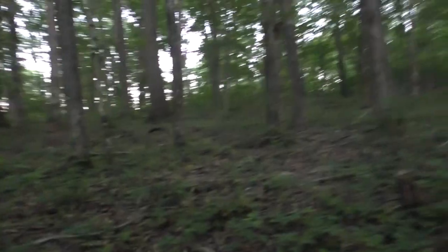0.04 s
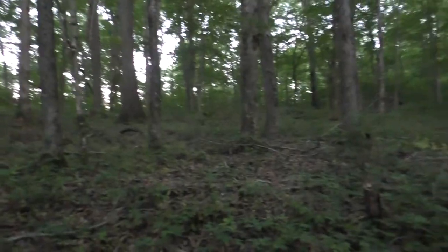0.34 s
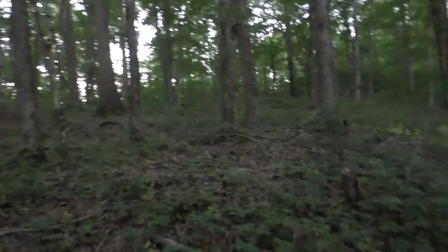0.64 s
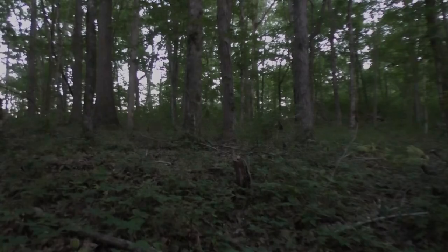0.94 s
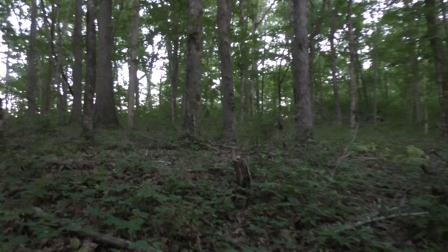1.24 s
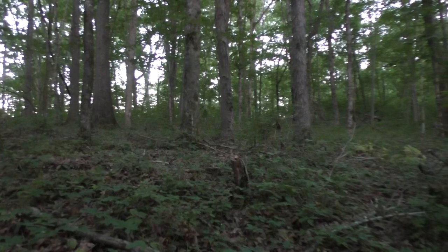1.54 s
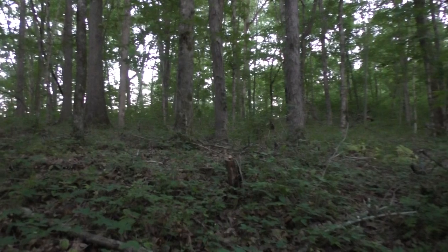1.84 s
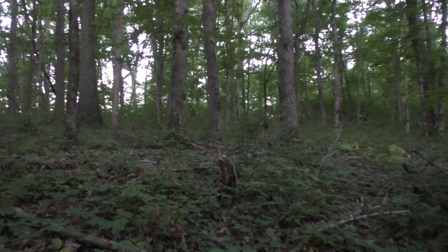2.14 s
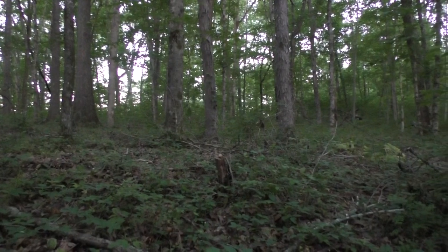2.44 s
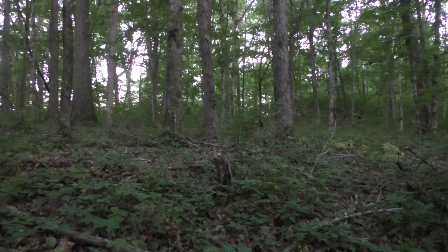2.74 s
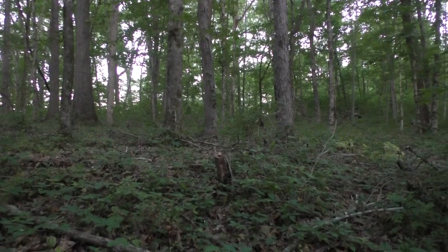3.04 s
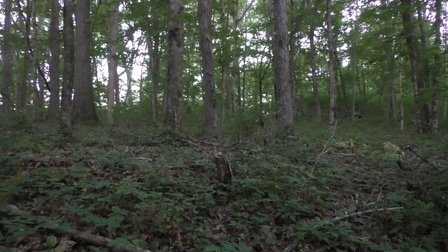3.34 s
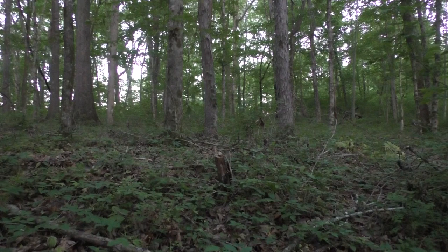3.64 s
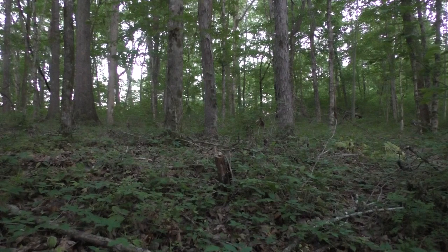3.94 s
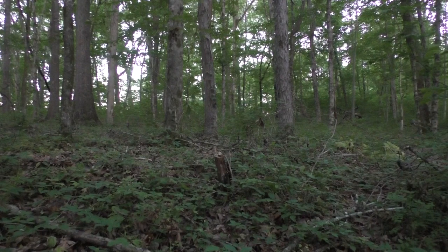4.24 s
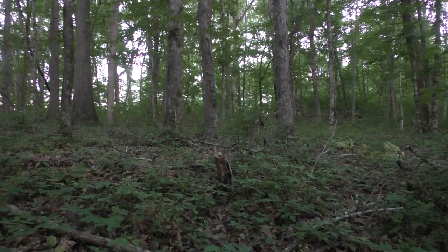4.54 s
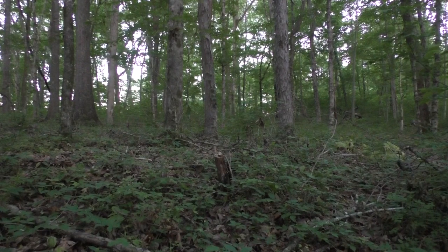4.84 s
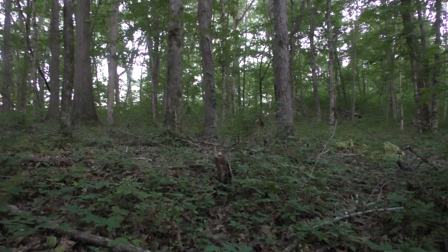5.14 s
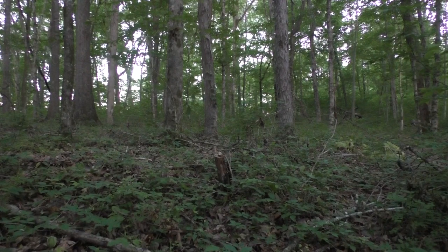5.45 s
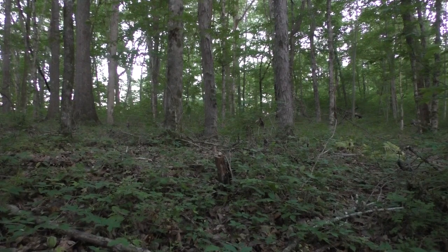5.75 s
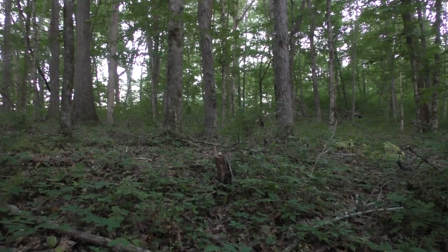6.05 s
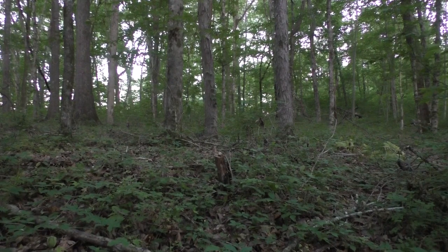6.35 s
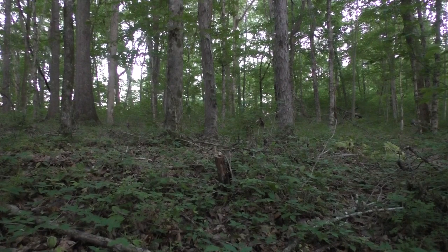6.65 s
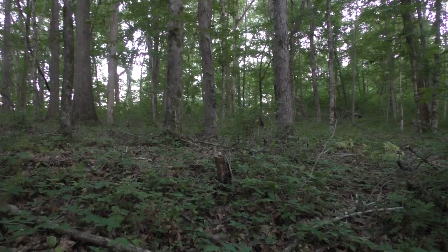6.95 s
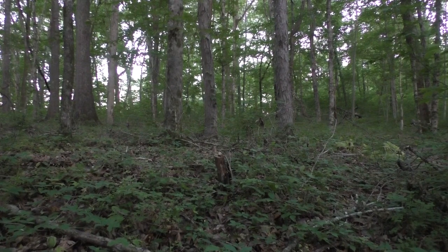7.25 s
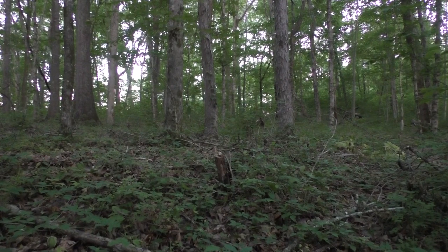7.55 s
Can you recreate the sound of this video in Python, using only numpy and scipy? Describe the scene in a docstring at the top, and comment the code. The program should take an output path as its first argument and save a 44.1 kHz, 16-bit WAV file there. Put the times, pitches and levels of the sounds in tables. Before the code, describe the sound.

Small birds whistle far off in a wood; after brief handling noise, eight loud, raspy turkey-like yelps sound close on the left.

```python
"""A rustle and a bump: a camera is set down in a wood, brushed by cloth and leaves, its mount clicking.
Small birds whistle far off, scattered by the trees, over a low drone and soft air.
Eight turkey-like yelps follow very close on the left, probably from a hunter's friction call: each
scrapes, holds a high note and breaks to a low one, an unsteady vibration ringing the call's resonances.
The camera's gain control ducks the wood after the yelps."""
import sys
import numpy as np
from scipy import signal
from scipy.fft import rfft, irfft, next_fast_len
from scipy.io import wavfile
from scipy.ndimage import uniform_filter1d, minimum_filter1d, map_coordinates

SR = 44100
rng = np.random.default_rng(int(sys.argv[2]) if len(sys.argv) > 2 else 0)


def bounce(signal):
    """Save signal as a 16-bit WAV file at the path given by the first command-line argument."""
    frames = np.transpose(np.atleast_2d(signal))
    limited = np.clip(frames, -1, 1)
    pcm = np.round(limited * 32767).astype(np.int16)
    wavfile.write(sys.argv[1], SR, pcm)


N = 339570


def amp(db):
    """Decibels to gain."""
    return 10 ** (np.asarray(db) / 20)


def pan(db):
    """Stereo gains: right up by db, left down by db."""
    return amp([[-db], [db]])


def unit(x):
    """Scale to rms 1."""
    return x / np.sqrt(np.mean(x ** 2) + 1e-20)


def along(points, hz):
    """Interpolate (f/Hz, value) points on a log axis."""
    f, v = np.transpose(points)
    return np.interp(np.log(hz + 1), np.log(f + 1), v)


def clock(length_s):
    """Sample times of a short sound."""
    return np.arange(int(length_s * SR)) / SR


def add(track, start_s, x):
    """Mix x into the track."""
    part = track[..., max(round(start_s * SR), 0):][..., :x.shape[-1]]
    part += x[..., :part.shape[-1]]


def wobble(rate_hz, size):
    """Smooth random curve, rate_hz knots a second."""
    at = np.arange(size) * rate_hz / SR
    return map_coordinates(rng.standard_normal(4096)[:int(at[-1]) + 4], [at])


def filtered(x, response):
    """Apply a frequency response."""
    m = next_fast_len(x.shape[-1] + SR // 10)
    return irfft(rfft(x, m) * response(np.fft.rfftfreq(m, 1 / SR)), m)[..., :x.shape[-1]]


def equalize(x, points):
    """Zero-phase filter through (f/Hz, gain/dB) points."""
    return filtered(x, lambda hz: amp(along(points, hz)))


def resonate(x, points, size=4096):
    """Minimum-phase filter through (f/Hz, gain/dB) points: the peaks ring on."""
    cepstrum = irfft(np.log(amp(along(points, np.fft.rfftfreq(size, 1 / SR)))))
    cepstrum[1:size // 2] *= 2
    cepstrum[size // 2:] = 0
    impulse = irfft(np.exp(rfft(cepstrum)))
    return signal.fftconvolve(x, impulse)[:len(x)]


# Left-right likeness of the noise: f/Hz, correlation
COHERENCE = [(30, 0.11), (60, 0.87), (290, 0.14), (1200, 0.78), (6800, 0.063)]


def stereo_noise(spectrum):
    """Shaped noise of rms 1, partly alike in the two channels."""
    def mid_side(hz):
        angle = np.arccos(np.clip(along(COHERENCE, hz), -1, 1)) / 2
        return amp(along(spectrum, hz)) * [np.cos(angle), np.sin(angle)]

    mid, side = filtered(rng.standard_normal((2, N)), mid_side)
    return unit(np.array([mid + side, mid - side]))


# Spectra of the drone and the air: f/Hz, level/dB
DRONE_SPECTRUM = [(30, -20), (64, 1.5), (82, -10), (101, -2.5), (130, -16.5), (400, -35), (1000, -92)]
AIR_SPECTRUM = [(250, -5.5), (850, -9.5), (1300, -11), (2000, -14.5), (3300, -10), (4800, -27.5),
                (7500, -22), (10800, -32.5), (13000, -26.5)]


def background():
    """A far low drone under soft air and hiss, both wavering slightly."""
    drone = amp(-38.5 + 0.91 * wobble(4.276, N)) * stereo_noise(DRONE_SPECTRUM)
    air = amp(-45.5 + 0.99 * wobble(0.46, N)) * stereo_noise(AIR_SPECTRUM)
    return drone * pan(1.5) + air * pan(1.1)


# Reverberation of the wood: f/Hz, t60/s
WOOD_DECAY = [(1200, 1.35), (3000, 1.88), (8000, 1.15)]


def trees(x, early_db, early_t60_s):
    """Stereo echo: dense scatter from near trunks, then the long tail of the wood."""
    hz, t, noise = signal.stft(rng.standard_normal((2, SR)), SR, nperseg=256)
    tail = amp(-60 * t / along(WOOD_DECAY, hz)[:, None])
    early = amp(early_db - 60 * t / early_t60_s)
    impulse = signal.istft(noise * (tail + early), SR, nperseg=256)[1]
    return signal.fftconvolve(x[None], impulse / np.linalg.norm(impulse[0]), axes=1)[:, :N]


def distant(song, direct_db, early_db):
    """A far bird: weak direct path, much scatter from the trees."""
    return amp(direct_db) * song + trees(song, early_db, early_t60_s=0.13)


def note(length_s, start_hz, middle_hz, end_hz, db, flutter):
    """A whistle bending through three pitches, widened by a fast flutter."""
    progress = clock(length_s) / length_s
    contour = np.polyfit([0, 0.5, 1], [start_hz, middle_hz, end_hz], 2)
    pitch_hz = np.polyval(contour, progress) * (1 + flutter * wobble(261.2, len(progress)))
    tone = np.sin(2 * np.pi * np.cumsum(pitch_hz) / SR)
    return amp(db) * unit(signal.windows.tukey(len(tone), 0.4) * tone)


# Birds too far off for single notes to stand out: start/s, stop/s, centre f/Hz, level/dB
CHORUS_SPANS = [(0.304, 0.696, 2980, -49.5), (1.498, 3.397, 4570, -62), (1.901, 4.103, 2788, -48.5),
                (4.62, 5.3, 3040, -40), (6.148, 7.7, 3454, -55), (6.15, 7.694, 5400, -54),
                (6.185, 7.7, 1349, -50.5)]


def chorus(count=20, pitch_spread=0.16):
    """Random far chirps that swell in, blurred by the trees."""
    chirps = np.zeros(N)
    for start_s, stop_s, centre_hz, db in CHORUS_SPANS:
        gap_s = (stop_s - start_s) / count
        for s in start_s + gap_s * (np.arange(count) + rng.random(count)):
            pitches_hz = centre_hz * (1 + pitch_spread * rng.uniform(-1.2, 1, 3))
            swell = min(0.49 + 3 * (s - start_s) / (stop_s - start_s), 1)
            chirp = note(0.07, *pitches_hz, db + 2 * rng.standard_normal(), flutter=0.0364)
            add(chirps, s, swell * np.sqrt(gap_s / 0.041) * chirp)
    return distant(chirps, direct_db=-15, early_db=-9) * pan(1)


# Notes that arch, slide down or flick up: t/s, length/s, top f/Hz, level/dB
ARCHED_NOTES = [(0.989, 0.099, 4570, -70), (1.168, .1, 3370, -51), (1.265, .1, 3920, -44),
                (2.027, 0.24, 3467, -40.5), (2.892, .11, 2380, -38), (3.167, 0.13, 2947, -33.5),
                (3.268, 0.09, 2430, -34), (3.815, 0.11, 3640, -36), (6.01, 0.24, 3383, -34.5)]
FALLING_NOTES = [(0.281, .15, 3058, -32), (2.548, 0.22, 3370, -35.5), (3.034, 0.05, 6600, -48),
                 (3.298, .11, 3254, -35.5), (3.395, .04, 6720, -48), (3.998, 0.088, 2513, -34),
                 (4.368, 0.075, 3147, -30.5), (5.431, 0.15, 3186, -35)]
RISING_NOTES = [(0.801, 0.052, 3380, -62), (.9, 0.044, 3920, -61), (1.856, 0.052, 4380, -53.5),
                (2.422, 0.046, 4030, -42.5), (3.637, 0.14, 2818, -34), (4.313, 0.079, 3250, -36.5),
                (6.416, 0.062, 4510, -42)]
# Buzzy song that climbs and swells: t/s, f/Hz, level/dB
BUZZY_NOTES = [(7.22, 5150, -55), (7.279, 4430, -49), (7.329, 6180, -49), (7.56, 6320, -46)]


def phrases(flutter_per_hz=1.1e-5):
    """Slurred bird notes, the higher ones fluttering more, and a buzzy song."""
    arch, fall, rise = (0.78, 0.96, 0.82), (0.98, 0.89, 0.77), (0.76, 0.9, 1)  # pitch / top pitch
    out = np.zeros(N)
    for contour, notes in (arch, ARCHED_NOTES), (fall, FALLING_NOTES), (rise, RISING_NOTES):
        for s, length_s, top_hz, db in notes:
            pitches_hz = top_hz * np.array(contour)
            add(out, s, note(length_s, *pitches_hz, db, flutter=flutter_per_hz * top_hz))
    for s, hz, db in BUZZY_NOTES:
        add(out, s, note(0.1, hz, hz, hz, db, flutter=0.0463))
    return out


# Rolling songs: t/s, level/dB
ROLLING_SONGS = [(1.379, -35.5), (5.499, -36.5)]


def rolling_songs(count=7, period_s=0.165, second_note_s=0.072):
    """A repeated pair of notes: one falls, the next is louder and trails a faint buzz."""
    out = np.zeros(N)
    for start_s, db in ROLLING_SONGS:
        for s in start_s + period_s * np.arange(count):
            add(out, s, note(0.0493, 2726, 2420, 2287, db - 1, flutter=0.02))
            add(out, s + second_note_s, note(0.0265, 2550, 2674, 2540, db + 4.5, flutter=0.023))
            add(out, s + second_note_s, note(period_s, 2550, 2550, 2550, db - 9, flutter=0.05))
    return out


# Thin whistles: t/s
THIN_WHISTLE_TIMES = [0.7, 1.24, 2.08, 2.781, 3.409, 4.04, 5.532, 7.28]


def thin_whistles():
    """Two high falling tones that start together."""
    out = np.zeros(N)
    for s in THIN_WHISTLE_TIMES:
        add(out, s, note(0.14, 8050, 7500, 7350, db=-54, flutter=0.0123))
        add(out, s, note(0.056, 6750, 6650, 6580, db=-56, flutter=0.0098))
    return out


# Low whistles: t/s, length/s, start f/Hz, end f/Hz, level/dB
LOW_NOTES = [(6.859, 0.22, 1634, 1635, -43), (7.178, 0.0644, 1687, 1425, -39),
             (7.384, .035, 1465, 2070, -40.5), (7.412, .03, 2004, 1700, -43),
             (7.441, 0.052, 1690, 1694, -35), (7.643, .055, 1540, 2750, -43)]


def low_whistler():
    """A bird wavering through low, straight glides."""
    out = np.zeros(N)
    for s, length_s, start_hz, end_hz, db in LOW_NOTES:
        add(out, s, note(length_s, start_hz, (start_hz + end_hz) / 2, end_hz, db, flutter=0.02))
    return out


def birds():
    """The small birds heard through the trees, mostly to the right."""
    slurs, rolls, thin, low = phrases(), rolling_songs(), thin_whistles(), low_whistler()
    out = distant(slurs, direct_db=-4, early_db=-4)
    out += distant(rolls, direct_db=-6, early_db=-1)
    out += amp(-4) * low + amp(-5) * trees(low, early_db=0, early_t60_s=0.1)
    out += distant(thin, direct_db=-21, early_db=-15)
    return out * pan(1.5)


# Handling envelope: t/s, rumble level/dB, rustle level/dB
HANDLING_LEVELS = [(0.0, -28.5, -37.5), (0.3, -16.5, -28), (0.495, -46, -24.5), (0.79, -39, -39.5)]
# Spectra of the handling noises: f/Hz, level/dB
RUSTLE_SPECTRUM = [(59, -45), (100, 1.5), (1100, -6.5), (2630, -11.5), (15500, -27.5)]
SWISH_SPECTRUM = [(400, -19), (1100, 4.5), (5000, -7), (9000, -6), (11000, -18), (15500, -12)]
RUMBLE_SPECTRUM = [(12, -38), (20, 8), (43, -11.5), (350, -29), (660, -120)]


def handling(swish_s=0.487, swish_width_s=0.073, swish_db=-23.5):
    """Cloth and leaves brush the swaying camera, with one bright swish on the right."""
    t = np.arange(N) / SR
    times_s, rumble_db, rustle_db = np.transpose(HANDLING_LEVELS)
    grain = unit(amp(1.24 * wobble(400, N)))
    rustle = amp(np.interp(t, times_s, rustle_db, right=-120)) * stereo_noise(RUSTLE_SPECTRUM)
    swish = amp(swish_db) * np.exp(-((t - swish_s) / swish_width_s) ** 2) * stereo_noise(SWISH_SPECTRUM)
    rumble = amp(np.interp(t, times_s, rumble_db, right=-120)) * stereo_noise(RUMBLE_SPECTRUM)
    return grain * (rustle * pan(2) + swish * pan(3)) + rumble * pan(-2)


# Clicks of the camera's mount: t/s, tick level/dB, knock level/dB
MOUNT_CLICKS = [(.16, -47, -19.5), (0.559, -34, -23), (0.731, -22, -23.5), (.749, -26, -19),
                (0.758, -39, -21), (.77, -33, -30)]


def mount_clicks(tick_t60_s=0.017, knock_t60_s=0.048):
    """Each click is two noise bursts: a bright tick and a duller knock."""
    out, t = np.zeros((2, N)), clock(0.3)
    for s, tick_db, knock_db in MOUNT_CLICKS:
        tick, knock = rng.standard_normal((2, 2, len(t)))
        knock = unit(equalize(knock, [(200, -7.5), (700, 7.5), (5000, -20)]))
        add(out, s, amp(tick_db - 60 * t / tick_t60_s) * tick)
        add(out, s, amp(knock_db - 60 * t / knock_t60_s) * knock)
    return out


# Tones of the bump: t/s, f/Hz, level/dB, t60/s
BUMP_MODES = [(0.255, 375, -5.5, 0.1), (0.264, 40.8, -4.5, 0.28)]


def bump(attack_s=0.0037, lead_rad=0.41):
    """The camera bumps down: damped tones that lead at the left port and lag at the right."""
    out, t = np.zeros((2, N)), clock(0.3)
    for s, hz, db, t60_s in BUMP_MODES:
        envelope = amp(db - 60 * t / t60_s) * (1 - np.exp(-t / attack_s))
        add(out, s, envelope * np.sin(2 * np.pi * hz * t + [[lead_rad], [-lead_rad]]))
    return out


# Where a yelp stalls into a faint squeak: t/s, length/s
YELP_STALLS = [(3.45, 0.006), (3.7734, .0015), (4.121, 0.0055), (4.478, 0.0031), (4.826, .004),
               (5.198, 0.0028), (5.5606, 0.0064), (5.57, 0.006), (5.583, 0.0027)]
# Ringing resonances of the yelping call: f/Hz, gain/dB
CALL_RESONANCES = [(300, -22), (560, -26), (675, -9), (850, -11.5), (1030, -1), (1180, 0.5), (1340, -5),
                   (1600, -9.5), (2000, -15.5), (2750, -30.5), (3600, -28.5), (4900, -41), (6000, -32),
                   (11500, -46)]
OPENING_HZ, SETTLE_S, HIGH_OVER_LOW, SAG_HZ_PER_S, SQUEAK_HZ = 1348, 0.0048, 1.46, 4300, 1950


def yelp(start_s, hold_s, high_s, low_s, low_hz, db, rasp, fade_db_per_s):
    """A tick and a stuttering attack, a high note that drops and sags, a break to the low register."""
    t = start_s + clock(high_s + low_s + 0.098)
    age_s = t - start_s
    break_s = start_s + high_s
    fade_s = break_s + low_s
    high = np.interp(t, [break_s, break_s + 0.00402], [1, 0])
    sag_hz = HIGH_OVER_LOW * low_hz + SAG_HZ_PER_S * (break_s - t)
    high_note_hz = sag_hz + (OPENING_HZ - sag_hz) * np.exp(-np.maximum(age_s - hold_s, 0) / SETTLE_S)
    low_note_hz = low_hz * (1.035 - 1.57 * np.minimum(t - break_s, 0.05))
    pitch_hz = high * high_note_hz + (1 - high) * low_note_hz

    # the vibration is unsteady at the onset, the stalls and the break
    stall = sum(np.exp(-(2 * (t - s) / length_s) ** 4) for s, length_s in YELP_STALLS)
    unsteady = np.exp(-age_s / 0.0053) + stall + np.exp(-((t - break_s) / 0.0044) ** 2)
    jitter = 0.1 * rasp * (0.3 + high) + 0.06 * unsteady
    phase = 2 * np.pi * np.cumsum(pitch_hz * (1 + jitter * wobble(939, len(t)))) / SR

    # soft yelps are duller; overtones die first
    harmonic = np.arange(1, 25)[:, None]
    tilt_db = min(db - 18, 0) * np.log2(harmonic)
    fading_db = fade_db_per_s * np.maximum(t - fade_s, 0)
    shimmer_db = 4 * np.array([wobble(90, len(t)) for _ in harmonic])
    colour_db = (harmonic > 2) * (6 * high - 7 + tilt_db + shimmer_db - 0.5 * fading_db)
    # on the low note the second partial overtakes the first
    colour_db += (harmonic == 1) * (1 - high) * np.interp(t, [break_s, break_s + 0.03], [7, -1])
    partials = np.cos(harmonic * phase + rng.uniform(0, 2 * np.pi, harmonic.shape))
    pulses = (partials * (harmonic * pitch_hz < SR / 2) * amp(colour_db)).sum(0)

    scrape = (rasp * (0.8 + 2.4 * high) + 0.45 * unsteady) * rng.standard_normal(len(t))
    squeak = 0.77 * stall * np.sin(2 * np.pi * SQUEAK_HZ * t)
    source = pulses * amp(-22 * stall) + scrape * amp(-6 * stall) + squeak
    swell_db = np.interp(t, [start_s, break_s, fade_s], [-0.5 * db, -0.15 * db, 0]) - fading_db
    tick = amp(-18 - 60 * age_s / 0.004) * rng.standard_normal(len(t))
    return amp(db + 6.5 + swell_db) * resonate(source, CALL_RESONANCES) + tick


# Yelps: t/s, opening hold/s, high note/s, low note/s, low f/Hz, level/dB, rasp 0-1, fade/(dB/s)
CALL_YELPS = [(3.0927, 0, 0.0022, 0.011, 624, 2, 0.04, 1899),
              (3.4443, 0.0017, .007, 0.025, 641, 9.5, 0.32, 1200),
              (3.771, .005, 0.025, 0.028, 665.5, 14, 0.34, 1210),
              (4.112, 0.012, 0.04, 0.042, 666, 16, 0.19, 1800),
              (4.4613, 0.017, 0.046, 0.044, 683, 17.5, 0.41, 1509),
              (4.825, .006, .047, 0.033, 666, 16.5, 0.24, 1797),
              (5.190, .009, .037, 0.037, 656, 18, 0.25, 1913),
              (5.555, .026, 0.04, 0.00094, 724, 3, 0.51, 620)]


def yelp_call(echo_db=-35, right_delay_s=2 / SR):
    """The yelps reach the left port first and louder; the wood answers faintly."""
    near, echo = np.zeros(N), np.zeros((2, N))
    for start_s, *shape in CALL_YELPS:
        call = yelp(start_s, *shape)
        add(near, start_s, call)
        thrown = equalize(call, [(700, -3.5), (1000, 7), (1350, -0.5)])  # the high note carries best
        add(echo, start_s, amp(echo_db) * trees(thrown, early_db=-18, early_t60_s=0.23))
    shadow = [(4000, -14.5), (12000, -10.5)]  # f/Hz, gain/dB
    right = filtered(near, lambda hz: amp(along(shadow, hz)) * np.exp(-2j * np.pi * hz * right_delay_s))
    return np.array([near, right]) + echo


def scene():
    """The sum at the two microphone ports; birds and camera noises reach the left a sample late."""
    left, right = birds() + chorus() + handling() + mount_clicks() + bump()
    late_left = np.pad(left, (1, 0))[:N]
    return yelp_call() + np.array([late_left, right]) + background()


def lag(x, tau_s):
    """One-pole smoothing."""
    keep = np.exp(-1 / (SR * tau_s))
    return signal.lfilter([1 - keep], [1, -keep], x)


def record(dry, threshold=0.43, recovery_db_per_s=150, ceiling=0.78, top_hz=15900):
    """Gain control with a quick and a slow recovery, peak limiter, band limit."""
    peak = np.abs(dry).max(0)
    over_db = np.maximum(20 * np.log10(peak / threshold + 1e-9), 0)
    recovery_db = recovery_db_per_s * np.arange(N) / SR
    held_db = np.maximum.accumulate(over_db + recovery_db) - recovery_db
    quick_db = lag(held_db, 0.0063)
    slow_db = 0.6 * lag(lag(quick_db, 0.35), 0.35)  # a run of loud sounds keeps the gain down longer
    ducked = dry * amp(-np.maximum(quick_db, slow_db))
    limit_gain = np.minimum(ceiling / (np.abs(ducked).max(0) + 1e-9), 1)
    limited = ducked * uniform_filter1d(minimum_filter1d(limit_gain, size=45), size=23)
    return filtered(limited, lambda hz: hz < top_hz)


dry = scene()
out = record(dry)
bounce(out)
```